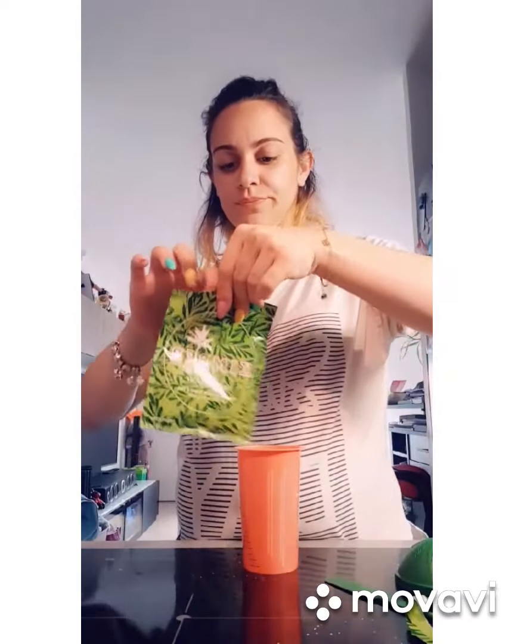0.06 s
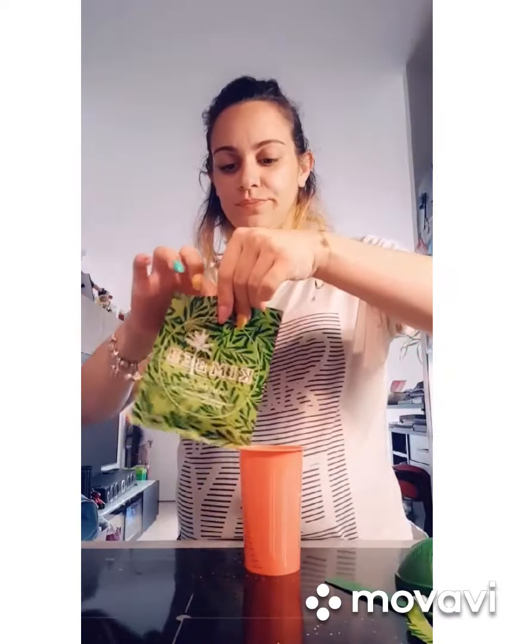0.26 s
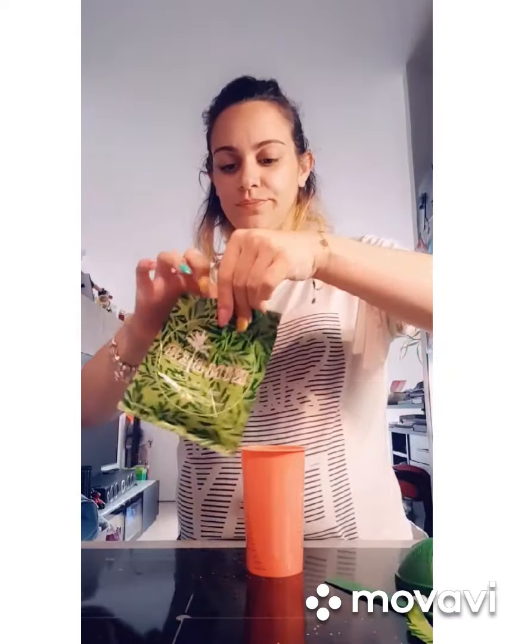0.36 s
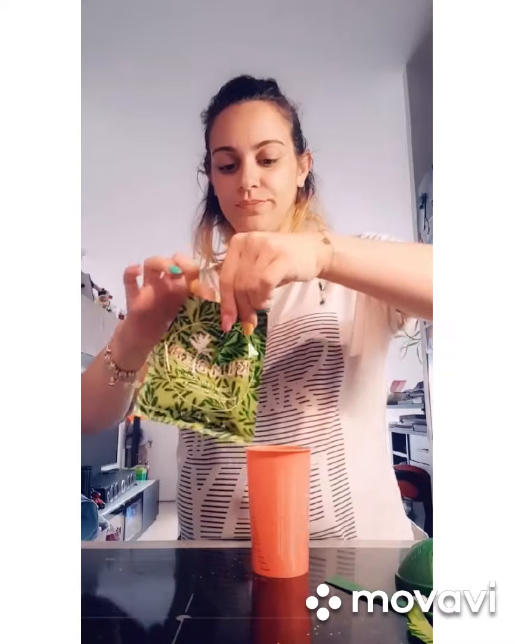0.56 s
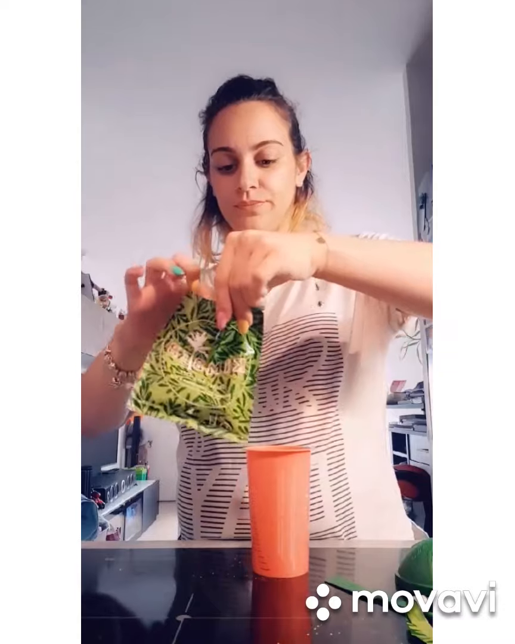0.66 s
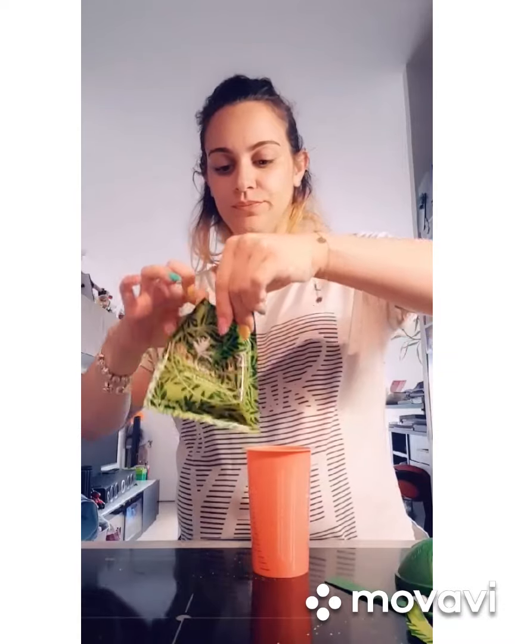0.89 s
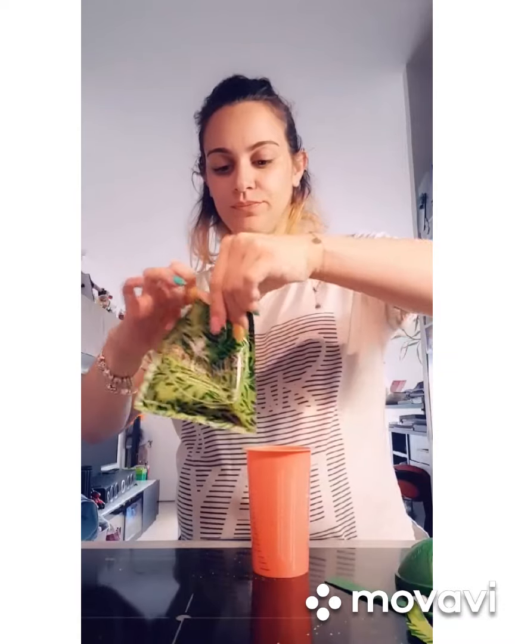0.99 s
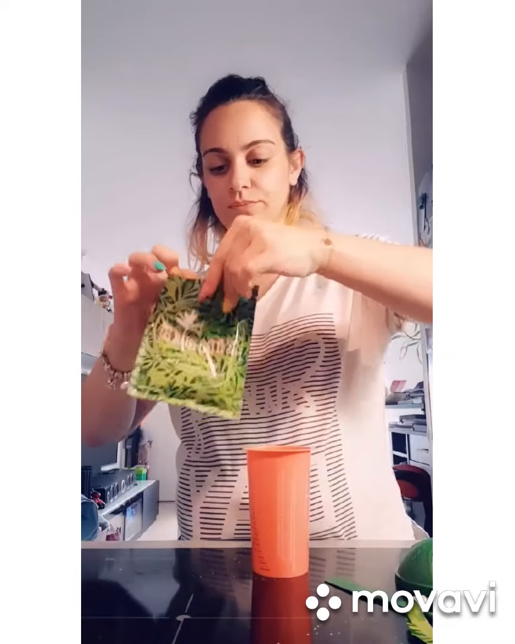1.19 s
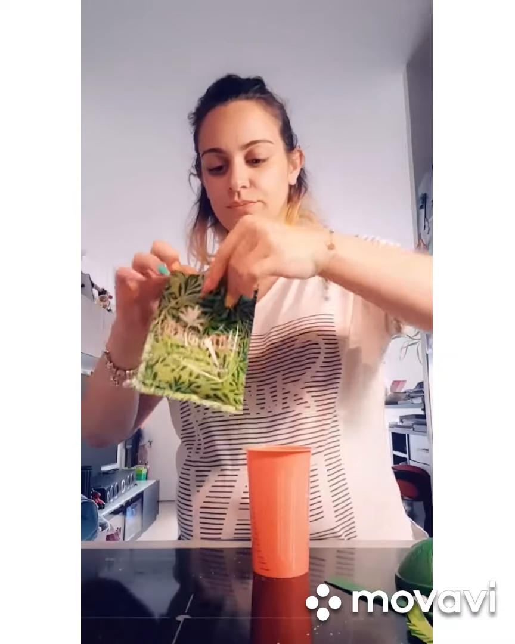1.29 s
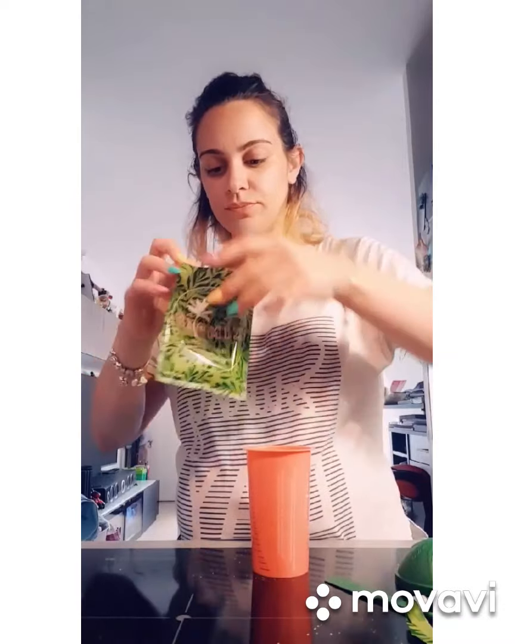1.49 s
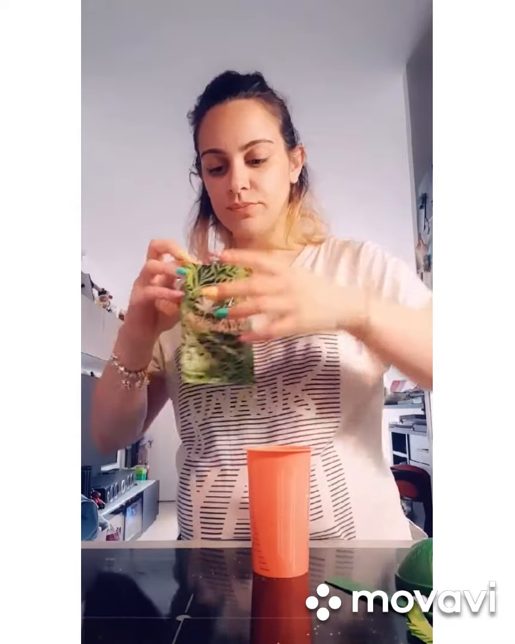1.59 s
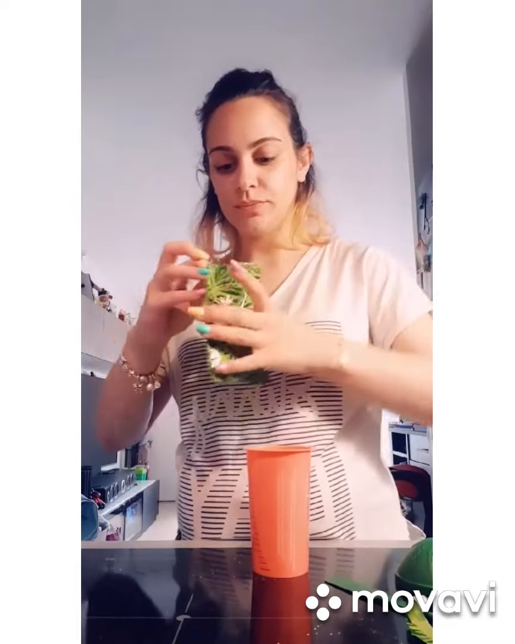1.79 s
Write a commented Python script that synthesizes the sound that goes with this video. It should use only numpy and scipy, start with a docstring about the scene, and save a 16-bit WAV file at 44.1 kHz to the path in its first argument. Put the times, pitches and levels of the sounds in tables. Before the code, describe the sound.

A foil sachet is crumpled and torn by hand close to the microphone; dense sharp snaps and two hollow knocks come in the first half second, then lighter scattered crinkles in a small hard-walled room.

```python
"""A foil sachet is pinched, crumpled and torn by hand in a small hard-walled room.
Snaps are clicks and dying rustles through a ringing panel; random pops ring briefly as dense crackle.
Two strong and two faint knocks, each with a bounce, ring a hollow body's modes.
Soft low bumps ring the counter; steady shaped noise lies underneath."""
import sys
import numpy as np
from scipy import signal
from scipy.fft import rfft, irfft
from scipy.io import wavfile

SR = 44100
rng = np.random.default_rng(int(sys.argv[2]) if len(sys.argv) > 2 else 0)


def store_wav(level_fs):
    """Save 16-bit WAV to argv[1]."""
    pcm = np.round(np.clip(np.atleast_2d(level_fs), -1, 1) * 32767)
    wavfile.write(sys.argv[1], SR, pcm.T.astype(np.int16))


N = 81585

# Snapping creases: start_s, level_db, body_rel_db, edge_rel_db, air_rel_db, panel_hz
SNAP_EVENTS = [(.139, -54, -9.5, -9.5, -15, 1677), (.1592, -33.5, -2, -4, 1.5, 1320),
               (.2838, -28.5, -0.5, -18.5, -20, 1572), (.304, -39, 4, -5, -8, 1550),
               (.3332, -36.5, -1.5, -10, -32, 1580), (.3714, -35, -0.5, -8, -17, 1460),
               (.393, -22, -12, -10, -11.5, 2310), (.4431, -21.5, -12.5, -19.5, -14.5, 1213),
               (.4634, -28, -5.5, -12, -25.5, 1380), (.483, -27.5, -5, -16, -29, 1490),
               (.5005, -30, 0, -38, -12, 1500), (.5243, -21.5, -11, -12, -24, 1727),
               (.5442, -16, -41, -19, -19, 1820), (.586, -29, 0.5, -22.5, -20, 1788),
               (.7776, -32, -8, -23, -25, 1540), (.7906, -41, -8, -28, 9, 1870),
               (.8088, -38.5, 1, -13, 1.5, 1260), (.868, -25.5, -20, -15, -8, 1214),
               (.8764, -22.5, -16, -48, -13, 1867), (.9158, -29.5, -31, -8, 1.5, 1540),
               (1.076, -38, -18.5, -25, -33, 1660), (1.1199, -29.5, -13.5, -18, -23.5, 968),
               (1.1348, -31, -33, -13.5, -8.5, 1164), (1.1494, -34.5, -16, -13, -29, 2120),
               (1.158, -41, -14.5, -30, -41, 1960), (1.3348, -46, -25, -8, -1, 1655),
               (1.3463, -38, -10.5, -13.5, -10.5, 1576), (1.488, -50.5, 1.5, -13, -9, 1150),
               (1.5218, -38, -17, -17.5, -22, 1780), (1.5734, -34.5, -15, -15.5, -34, 1435),
               (1.6389, -30.5, -18.5, -7.5, -16.5, 1606)]
# Snap rustle bands (body, edge, air): low_hz, high_hz, t60_s
RUSTLE_BANDS = [(200, 1040, 0.068), (2170, 5070, 0.044), (9600, 21800, 0.036)]
# Squeezing of the foil: time_s, middle_db, treble_db
SQUEEZE_LEVELS = [(0, -76.5, -82), (0.04, -64, -58), (.08, -80, -75), (0.151, -88, -82), (0.163, -43, -53),
                  (0.249, -53.5, -52.5), (.34, -55, -62), (0.432, -50.5, -55.5), (0.45, -42, -44.5),
                  (.51, -41.5, -53.5), (0.559, -60.5, -64), (.77, -78, -87), (0.796, -40, -68),
                  (0.859, -64, -61), (0.883, -45.5, -73), (.96, -81, -103.5), (1.11, -77, -82),
                  (1.137, -46.5, -52), (1.199, -82.5, -73), (1.319, -81, -92.5), (1.352, -57, -79.5),
                  (1.41, -76, -77), (1.466, -55.5, -63), (1.511, -83, -76.5), (1.544, -42.5, -60),
                  (1.6, -79, -87), (1.66, -62, -62), (1.813, -93.5, -102), (1.85, -53.5, -52.5)]
# Crackle colour: pitch_hz, density_db (per Hz)
FOIL_COLOUR = [(350, -6), (800, -2), (1500, 4), (2400, -9.5), (3000, -9.5), (5000, -13.5), (7500, -18)]
# Hollow knocks: start_s, level_db, contact_cutoff_hz
KNOCK_EVENTS = [(.2212, -14.5, 1474), (0.545, -10, 2930), (.588, -31, 962), (1.6395, -33, 587)]
# Hollow body modes: pitch_hz, level_db, t60_s
HOLLOW_MODES = [(190, -13.5, 0.18), (300.2, -10.5, 0.11), (351.4, -18, 0.16), (708, -9, 0.053),
                (548.6, -4, 0.16), (876, -22.5, 0.27), (567, -16, 0.35), (1022, -23.5, 0.35),
                (761.5, -0.5, 0.041), (1046.8, -8, 0.12), (772, -21, 0.18), (1536, -13, 0.053),
                (1260, -13.5, 0.045), (1666, -20.5, 0.062), (2018, -10.5, 0.026), (5100, -18, .06)]
# Counter bumps: start_s, level_db, contact_cutoff_hz
BUMP_EVENTS = [(0.168, -23, 89), (0.223, -14, 89.3), (0.289, -19, 88.8), (0.392, -27, 85.7),
               (0.465, -22.5, 88.1), (0.551, -26, 93.3), (0.59, -23.5, 90.4), (0.795, -35.5, 706),
               (0.812, -37.5, 713), (0.87, -36, 700), (1.579, -31.5, 81), (1.62, -26.5, 76.9),
               (1.682, -30.5, 81), (1.739, -37, 81.4)]
# Counter modes: pitch_hz, level_db, t60_s
COUNTER_MODES = [(72.7, -17.5, 0.51), (100.54, -7.5, 0.37), (266, -2, 0.073), (340, 9, 0.027)]
# Background noise colour: frequency_hz, density_db (per Hz)
FLOOR_COLOUR = [(25, 19.5), (45, 7.5), (100, 10), (180, 0.5), (350, 4.5), (550, -17), (1500, -34),
                (2500, -22.5), (5000, -30.5), (9500, -46), (11000, -20.5), (16000, -27.5)]
# Room decay: frequency_hz, t60_s
ROOM_DECAY = [(200, 0.7), (600, 0.35), (1500, 0.23), (4000, 0.29), (12000, 0.18)]

PANEL_T60_S, PANEL_WIDTH_RATIO, PANEL_DB, SNAP_RISE_S = 0.033, 1.244, -7, 0.00025
CRACK_DB, CRACK_LAG_S = 14.5, 0.0011  # click: gain beside the rustle, delay after its onset
PING_DB, PING_T60_S = -7.5, 0.033
OVERTONE_RATIO, OVERTONE_DB = 1.42, -9  # panel's second mode, relative to its first
CRACKLES_PER_S, CRACKLE_SPREAD_DB, CRACKLE_T60_CYCLES = 5500, 2.8, 14.0
FIZZ_LOW_DB = 3  # gain of the lower fizz band
KNOCK_BOUNCE_S, KNOCK_BOUNCE_DB = 0.0082, -4.5
ROOM_DB, ROOM_RISE_S = -13, 0.0045
FLOOR_DB = -55
MIC_DIP_HZ, MIC_DIP_WIDTH_HZ, MIC_DIP_DEPTH = 8360, 7250, 0.63  # depth: fraction removed at centre
RUMBLE_CUT_HZ, TOP_CUT_HZ = 54, 15900


def from_db(db):
    """dB to amplitude gain."""
    return 10 ** (np.asarray(db) / 20)


def rms_one(x):
    """Scale to rms 1."""
    return x / np.sqrt(np.mean(x ** 2) + 1e-20)


def at_hz(points, hz):
    """Interpolate a table's second column on a log-frequency axis."""
    table = np.array(points)
    return np.interp(np.log(hz), np.log(table[:, 0]), table[:, 1])


def band(x, low_hz, high_hz):
    """Butterworth band-pass."""
    sos = signal.butter(2, [low_hz, high_hz], "band", fs=SR, output="sos")
    return signal.sosfilt(sos, x)


def ring(clicks, hz, t60_s):
    """Damped resonator: a unit click starts a decaying sine of height 1."""
    r = from_db(-60 / (t60_s * SR))
    w = 2 * np.pi * hz / SR
    return signal.lfilter([0, np.sin(w)], [1, -2 * r * np.cos(w), r * r], clicks + 1e-18)


def soft(x, cutoff_hz):
    """Soft contact: two one-pole low-passes blunt the blow."""
    r = np.exp(-2 * np.pi * cutoff_hz / SR)
    return signal.lfilter([(1 - r) ** 2], [1, -2 * r, r * r], x)


def snap_band(noise, click, low_hz, high_hz, t60_s):
    """One band of a snap: click plus decaying rustle, compensated for bandwidth."""
    t = np.arange(len(noise)) / SR
    rustle = noise * (1 - np.exp(-t / SNAP_RISE_S)) * from_db(-60 * t / t60_s)
    struck = band(rustle + from_db(CRACK_DB) * click, low_hz, high_hz)
    return struck * np.sqrt(SR / 2 / (high_hz - low_hz))


def panel_ping(click, hz):
    """The click rings two modes of the foil panel."""
    overtone = ring(click, OVERTONE_RATIO * hz, PING_T60_S)
    return ring(click, hz, PING_T60_S) + from_db(OVERTONE_DB) * overtone


def snaps():
    """A crease snaps: panel modes and a rustle around them, with body, edge and air bands."""
    out = np.zeros(N + SR)
    length = SR // 8
    noise = rng.standard_normal((len(SNAP_EVENTS), length))
    unit_click = np.arange(length) == int(CRACK_LAG_S * SR)
    clicks = unit_click * np.sign(noise[:, :1])  # random polarity

    for k, (start_s, level_db, *rel_dbs, panel_hz) in enumerate(SNAP_EVENTS):
        low_hz, high_hz = panel_hz / PANEL_WIDTH_RATIO, panel_hz * PANEL_WIDTH_RATIO
        burst = from_db(PING_DB) * panel_ping(clicks[k], panel_hz)
        burst += from_db(PANEL_DB) * snap_band(noise[k], clicks[k], low_hz, high_hz, PANEL_T60_S)
        for rel_db, limits in zip(rel_dbs, RUSTLE_BANDS):
            burst += from_db(rel_db) * snap_band(noise[k], clicks[k], *limits)
        out[int(start_s * SR):][:length] += from_db(level_db) * burst
    return out[:N]


def crackle():
    """Tiny creases pop at random, each ringing a few cycles; pops and noise fizz in the treble."""
    time_s, middle_db, treble_db = np.transpose(SQUEEZE_LEVELS)
    t = np.arange(N) / SR
    size_db = CRACKLE_SPREAD_DB * np.minimum(rng.exponential(1, N), 5)
    sizes = from_db(size_db) * rng.choice([-1, 1], N)
    pops = sizes * (rng.random(N) < CRACKLES_PER_S / SR)

    # each pop is dealt one of 24 pitches
    pitches_hz = np.geomspace(350, 7500, 24)
    dealt = rng.integers(0, 24, N)
    middle = np.zeros(N)
    for k, hz in enumerate(pitches_hz):
        gain = from_db(at_hz(FOIL_COLOUR, hz)) * hz
        middle += gain * ring(pops * (dealt == k), hz, CRACKLE_T60_CYCLES / hz)

    fizz = pops + rng.standard_normal(N)
    treble = band(fizz, 9500, 17500) + from_db(FIZZ_LOW_DB) * band(fizz, 4600, 6800)
    middle_gain = from_db(np.interp(t, time_s, middle_db))
    treble_gain = from_db(np.interp(t, time_s, treble_db))
    return middle_gain * rms_one(middle) + treble_gain * rms_one(treble)


def knocks():
    """Each knock and its quick bounce strike the hollow body's modes."""
    contacts = np.zeros(N)
    for start_s, level_db, cutoff_hz in KNOCK_EVENTS:
        hit = np.zeros(N)
        hit[int(start_s * SR)] = from_db(level_db)
        hit[int((start_s + KNOCK_BOUNCE_S) * SR)] = from_db(level_db + KNOCK_BOUNCE_DB)
        contacts += soft(hit + 1e-18, cutoff_hz)

    out = np.zeros(N)
    for k, (hz, level_db, t60_s) in enumerate(HOLLOW_MODES):
        out += (-1) ** k * from_db(level_db) * ring(contacts, hz, t60_s)  # alternating polarity
    return out


def bumps():
    """Soft pushes ring the counter's low modes."""
    contacts = np.zeros(N)
    for start_s, level_db, cutoff_hz in BUMP_EVENTS:
        push = np.full(N, 1e-18)
        push[int(start_s * SR)] = from_db(level_db)
        contacts += soft(push, cutoff_hz)
    modes = sum(from_db(level_db) * ring(contacts, hz, t60_s) for hz, level_db, t60_s in COUNTER_MODES)
    return band(modes, RUMBLE_CUT_HZ, 2000)


def room(x):
    """Dense reflections: noise in octave bands, each with its own decay, scaled to unit energy."""
    t = np.arange(SR // 2) / SR
    edges_hz = 60 * 2. ** np.arange(9)
    tail = np.zeros(len(t))
    for low_hz, high_hz in zip(edges_hz, edges_hz[1:]):
        t60_s = at_hz(ROOM_DECAY, low_hz * 1.4)  # near the octave's centre
        tail += band(rng.standard_normal(len(t)), low_hz, high_hz) * from_db(-60 * t / t60_s)
    tail *= 1 - np.exp(-t / ROOM_RISE_S)
    return signal.fftconvolve(x, tail / np.sqrt(np.sum(tail ** 2)))[:N]


def floor():
    """Steady room and microphone noise: white noise shaped in frequency."""
    hz = np.maximum(np.arange(N // 2 + 1) * SR / N, 10)
    spectrum = rfft(rng.standard_normal(N)) * from_db(at_hz(FLOOR_COLOUR, hz))
    return from_db(FLOOR_DB) * rms_one(irfft(spectrum, N))


def microphone_dip(x):
    """Broad treble dip: part of a resonant band is subtracted."""
    b, a = signal.iirpeak(MIC_DIP_HZ, MIC_DIP_HZ / MIC_DIP_WIDTH_HZ, SR)
    return x - MIC_DIP_DEPTH * signal.lfilter(b, a, x)


def scene():
    """Foil and knocks pass through room and microphone dip; bumps and floor arrive directly."""
    direct = snaps() + crackle() + knocks()
    near = microphone_dip(direct + from_db(ROOM_DB) * room(direct))
    return (near + bumps() + floor())[None]


def record(dry):
    """The microphone drops the deepest rumble; a steep low-pass cuts the top."""
    high_pass = signal.butter(4, RUMBLE_CUT_HZ, "high", fs=SR, output="sos")
    low_pass = signal.ellip(8, .5, 45, TOP_CUT_HZ, fs=SR, output="sos")
    return signal.sosfilt(low_pass, signal.sosfilt(high_pass, dry))


dry = scene()
out = record(dry)
store_wav(out)
```